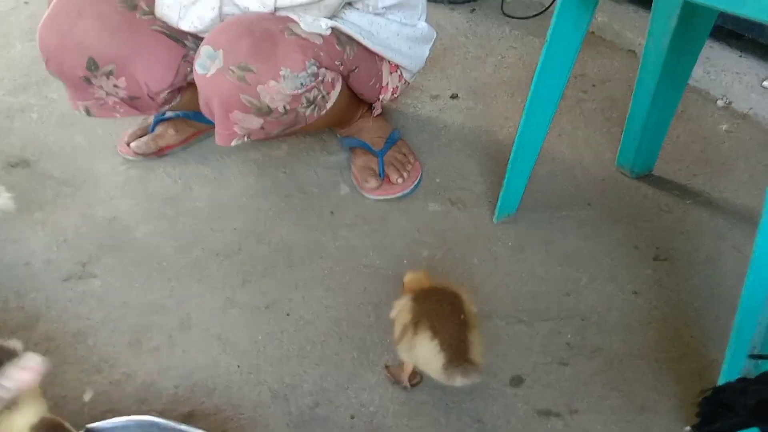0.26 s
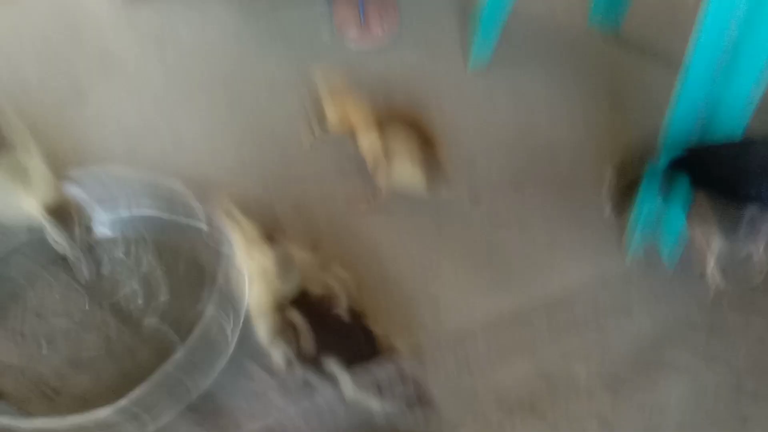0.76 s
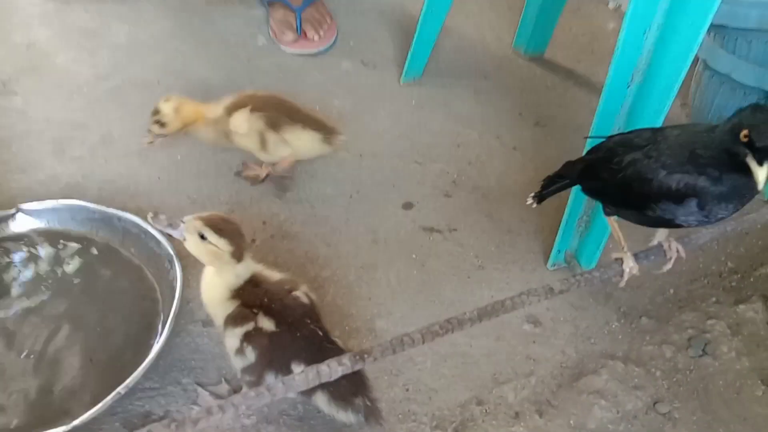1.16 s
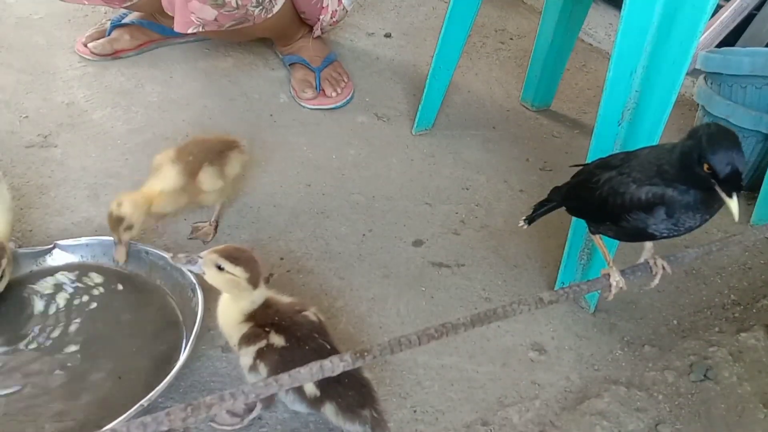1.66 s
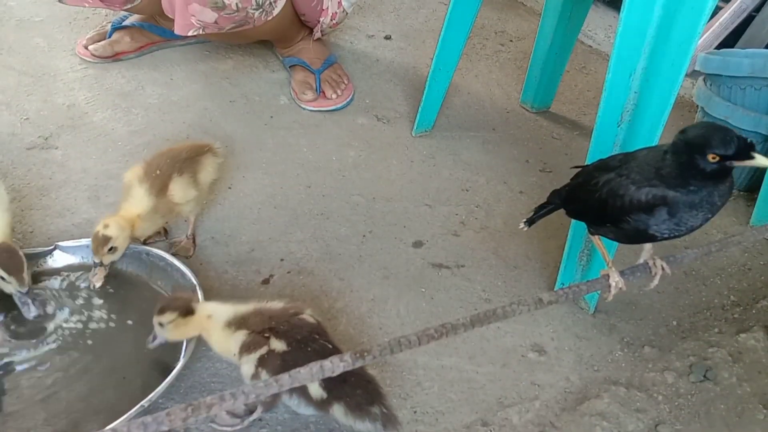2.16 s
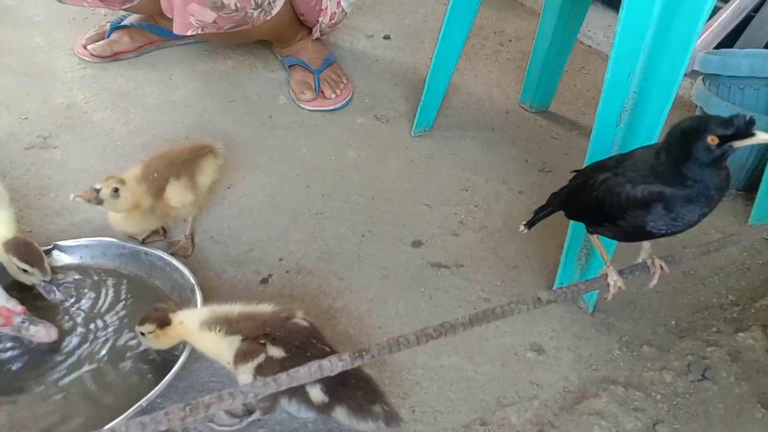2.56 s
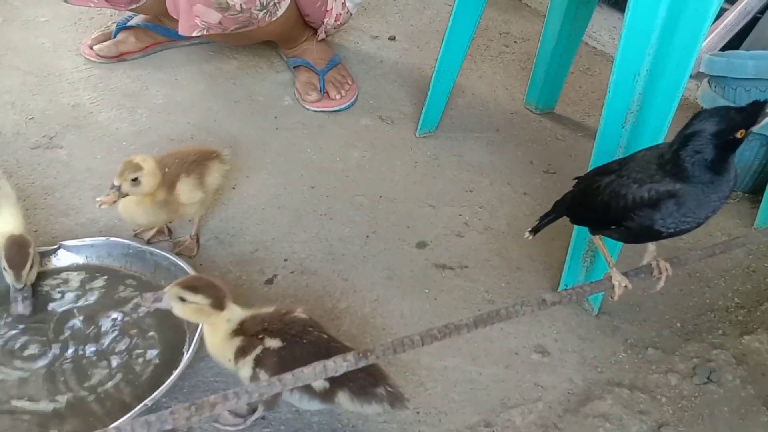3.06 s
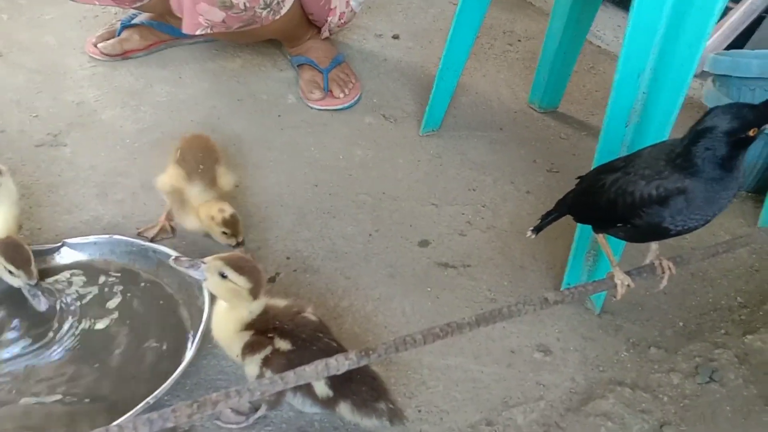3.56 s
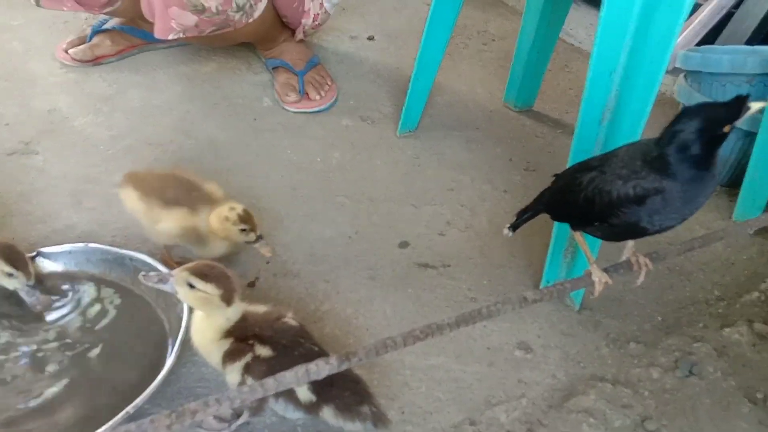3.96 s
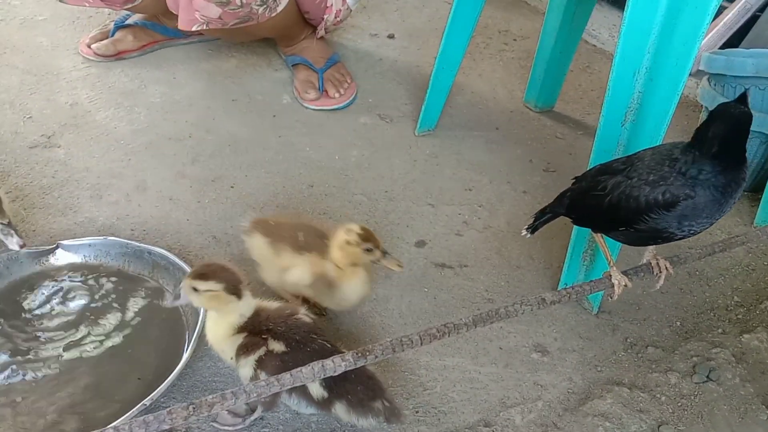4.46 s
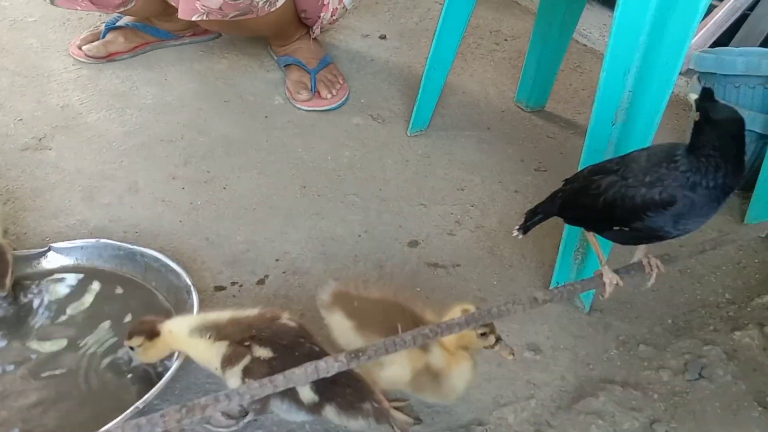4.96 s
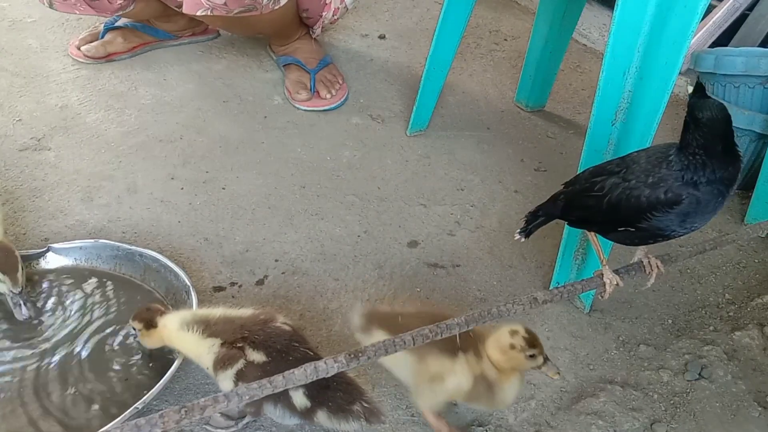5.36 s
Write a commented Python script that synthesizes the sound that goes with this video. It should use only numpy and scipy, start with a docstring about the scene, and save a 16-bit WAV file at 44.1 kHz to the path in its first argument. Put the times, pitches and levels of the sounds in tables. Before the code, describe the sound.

A duckling gives short, high, falling whistled peeps about four times a second, with weaker arched pips from another. In the first second the hand-held microphone is rubbed and sharply clicked and bumped. It then settles, and bills tick, peck and knock at a metal water basin with soft dabbling and drips. Fainter reedy, hoarse birds call further off in a roofed concrete yard.

```python
"""Ducklings peep around a metal water basin on a concrete floor under a roof; the walls smear each glide.
One gives long falling peeps, another short arched pips: trembling whistles with weak overtones.
Further off, other birds call in tones roughened by noise. Bills knock, tick and peck, as struck resonances,
and dabble, as swelling water noise with ringing drips. Close by, the hand-held microphone is rubbed
(swelling noise) and bumped (struck resonances) as it moves, over quiet yard air, a faint hum and its own hiss."""
import sys
import numpy as np
from scipy import signal
from scipy.fft import rfft, irfft, next_fast_len
from scipy.io import wavfile
from scipy.ndimage import uniform_filter1d, map_coordinates

SR = 44100
rng = np.random.default_rng(int(sys.argv[2]) if len(sys.argv) > 2 else 0)


def generate_wav(sig):
    """Save sig (samples, or channels by samples) to the path in sys.argv[1] as 16-bit PCM at SR."""
    pcm = np.round(np.clip(np.atleast_2d(sig).T, -1, 1) * 32767).astype(np.int16)
    wavfile.write(sys.argv[1], SR, pcm)


N = 247966
TIME = np.arange(N) / SR


def amp(db):
    """Decibels to gain."""
    return 10 ** (np.asarray(db) / 20)


def unit(x):
    """Scaled to rms 1."""
    return x / np.sqrt(np.mean(x ** 2) + 1e-20)


def along(points, hz):
    """(Hz, value) points read on a log frequency axis."""
    f, v = np.transpose(points)
    return np.interp(np.log(hz + 1), np.log(f), v)


def wobble(rate, size=N):
    """A smooth random curve, rate knots a second."""
    knots = rng.standard_normal(int(size * rate / SR) + 4)
    return map_coordinates(knots, [np.arange(size) * rate / SR])


def filtered(x, response):
    """x times a complex response of frequency."""
    m = next_fast_len(len(x) + SR // 4)
    return irfft(rfft(x, m) * response(np.fft.rfftfreq(m, 1 / SR)), m)[:len(x)]


def noise(spectrum, spiky_db):
    """Coloured noise of rms 1, made of grains of uneven size."""
    grains = amp(spiky_db * np.minimum(wobble(700), 2))
    return unit(filtered(rng.standard_normal(N) * grains, lambda hz: amp(along(spectrum, hz))))


def patchy(x):
    """Noise whose colour shifts from moment to moment."""
    depth_db = 3.5
    z = signal.stft(x.astype(np.float32), nperseg=512)[2]
    field = uniform_filter1d(rng.standard_normal(z.shape), size=5, axis=0)
    field = uniform_filter1d(field, size=7, axis=1)
    gain = amp(depth_db * np.minimum(unit(field), 2))
    return unit(signal.istft(z * gain, nperseg=512)[1][:N])


def swell(s, rise, fall):
    """Gain of a movement that builds up to time s and dies away."""
    drop_db, shape = 14.5, 2.4  # softer by this one rise before and one fall after; shape 1 pointed, 2 round
    gain = np.zeros(N)
    near = slice(*np.searchsorted(TIME, [s - 4 * abs(rise), s + 4 * abs(fall)]))
    u = np.maximum((s - TIME[near]) / abs(rise), (TIME[near] - s) / abs(fall))
    gain[near] = amp(-drop_db * u ** shape)
    return gain


def swells(rows):
    """Gain of a run of even swells."""
    return sum(amp(db) * swell(s, spread, spread) for s, spread, db in rows)


def add(track, s, sound):
    """Mix a sound into the track at time s."""
    start = round(s * SR)
    part = sound[max(-start, 0):N - start]
    track[max(start, 0):][:len(part)] += part


def fade(size, edge):
    """A flat envelope whose ends taper; edge is the share of the length that the two tapers take up."""
    return signal.windows.tukey(size, np.clip(edge, 0, 1))


def room(x, wet_db, early_db):
    """Direct sound, early walls and a diffuse tail; paths are drawn afresh every quarter second and crossfade."""
    # decay of the walls: f/Hz, t60/s
    wall_decay = [(200, 0.092), (1200, 0.13), (3000, 0.19), (8000, 0.082), (15000, 0.013)]
    out, size = x.copy(), SR // 3
    for start in range(0, N, SR // 4):
        hz, t, z = signal.stft(rng.standard_normal(size), SR, nperseg=256)
        decay = amp(-60 * t / along(wall_decay, hz)[:, None])
        onset = 1 - np.exp(-t / 0.003)
        tail = signal.istft(z * decay * onset, SR, nperseg=256)[1]
        tail *= amp(wet_db) / np.linalg.norm(tail)
        echoes = (rng.uniform(.008, .036, size=6) * SR).astype(int)
        tail[echoes] += amp(early_db) * rng.choice([-1, 1], size=6)
        # each set of paths crossfades into the next
        share = np.clip(1.5 - abs(np.arange(N) - start - SR // 8) / (SR // 8), 0, 1)
        first = max(start - SR // 8, 0)
        add(out, first / SR, signal.fftconvolve((x * share)[first:start + SR // 2], tail))
    return out


def syrinx(pitch, effort, overtones, waver, flutter_db):
    """A nearly pure, trembling whistle; its overtones come and go and need full effort."""
    size = len(pitch)
    phase = 2 * np.pi * np.cumsum(pitch * (1 + waver * wobble(250, size))) / SR
    edge = sum(amp(db + 1.6 * wobble(50, size)) * np.sin(k * phase) for k, db in enumerate(overtones, 2))
    return effort * (np.sin(phase) + effort ** 2 * edge) * amp(flutter_db * wobble(120, size))


def hoarse(pitch, share, blur_rate):
    """A tone partly broken up into a narrow band of noise; blur_rate is in knots a second."""
    size, share = len(pitch), np.clip(share, 0, 1)
    blur = (wobble(blur_rate, size) + 1j * wobble(blur_rate, size)) / np.sqrt(2)
    carrier = np.exp(2j * np.pi * np.cumsum(pitch) / SR)
    return np.real((np.sqrt(1 - share) + np.sqrt(share) * blur) * carrier)


def stroke(rise, fall):
    """Progress through a call: -1 at its start, 0 at its top, 1 at its end."""
    t = np.arange(-abs(rise), abs(fall), 1 / SR)
    return t / np.where(t < 0, abs(rise), abs(fall))


def arch(u):
    """How far an arched call lies below its top: 0 there, 1 at both ends."""
    rounding = .36  # how blunt the top is
    return (np.hypot(u, rounding) - rounding) / (np.hypot(1, rounding) - rounding)


def strike(modes, t60, scrape, soft_hz):
    """One push and a dying scrape through a body's resonances, peak 1; a soft contact loses its treble."""
    t = np.arange(SR // 4) / SR
    force = scrape * rng.standard_normal(len(t)) * amp(-60 * t / t60)
    force[0] += 1

    def body(f):
        """Resonances side by side, of alternating sign."""
        return sum((-1) ** k * amp(db) * 1j * f * width / (hz * hz - f * f + 1j * f * width)
                   for k, (hz, width, db) in enumerate(modes))

    sound = filtered(force, lambda f: body(f) / (1 + 1j * f / soft_hz) ** 2)
    return sound / abs(sound).max()


def peeps():
    """Each peep lifts quickly, sags, then plunges as the pressure goes; a little air rasps along."""
    # long falling peeps: t/s of the top, fall/s, top f/Hz, drop/Hz, relative level/dB
    peep_rows = [(.002, 0.043, 2940, 287, -28), (.006, 0.052, 3155, 264, -39),
                 (0.158, 0.087, 2857, 565, -35), (.278, .055, 3123, 497, -28),
                 (.43, 0.049, 2925, 407, -31.5), (.687, 0.073, 2902, 430, -32),
                 (0.848, 0.043, 3240, 160, -49.5), (.938, 0.064, 2902, 462, -33),
                 (1.186, 0.048, 2990, 260, -32), (1.446, 0.084, 3044, 800, -35.5),
                 (1.69, 0.069, 2990, 743, -34), (1.939, 0.077, 3060, 770, -34),
                 (2.19, 0.065, 3072, 662, -33), (2.475, 0.063, 2988, 620, -29.5),
                 (2.767, .062, 3002, 743, -35), (3.019, .07, 3018, 770, -32.5),
                 (3.269, 0.082, 2985, 690, -33.5), (3.527, 0.068, 2920, 592, -32.5),
                 (3.8, 0.066, 2952, 717, -35), (4.067, 0.059, 2993, 745, -36.5),
                 (4.324, 0.039, 3194, 638, -32), (4.55, .055, 3195, 633, -50)]
    # harmonics 2 to 4 against the whistle at full effort: mean level/dB
    overtones = [-33.5, -34.5, -54]
    # colour of the air in a peep: f/Hz, relative level/dB
    rasp_colour = [(300, -7.5), (800, -1.5), (1270, -2), (1700, -7), (2400, 9), (3300, 10.5), (4200, -7.5),
                   (5700, -10.5), (7500, -12), (9000, -13.5), (14000, -37.5)]
    rise_s, lift_hz = .022, 277.3  # the climb to every top
    sag_share = .33  # share of the drop that is a steady sag; the rest plunges at the end
    loudest = 0.33  # this far into the fall
    attack_db, release_db = 18.5, 9.5  # how much softer the start and the end are
    out, flow = np.zeros(N), np.zeros(N)
    for s, fall, top_hz, drop_hz, db in peep_rows:
        u = stroke(rise_s, fall)
        sag = sag_share * u + (1 - sag_share) * u ** 4
        pitch = top_hz - np.where(u < 0, lift_hz * abs(u) ** 3, drop_hz * sag)
        past = u - loudest
        attack = attack_db * (past / (1 + loudest)) ** 2
        release = release_db * (past / (1 - loudest)) ** 2
        effort = amp(-np.where(past < 0, attack, release)) * fade(len(u), edge=0.093)
        whistle = syrinx(pitch, effort, overtones, waver=.005, flutter_db=1.1)
        add(out, s - rise_s, amp(db - 3.5) * whistle)
        add(flow, s - rise_s, amp(db) * effort)
    rasp = amp(-29.5) * flow * noise(rasp_colour, spiky_db=3)
    return room(out + rasp, wet_db=-2, early_db=-13)


def yard():
    """The quiet of the yard as shifting noise, a wavering low hum and the microphone's steady hiss."""
    # still air: f/Hz, relative level/dB
    air_colour = [(20, -22), (40, -19), (62, 2), (100, -4.5), (160, -1.5), (240, -6), (330, -13),
                  (600, -14.5), (1000, -15.5), (1270, -5.5), (1600, -21), (2900, -14.5), (4000, -20.5),
                  (6000, -25), (9000, -49.5)]
    # course of the still air, which wavers about it: t/s, level/dB
    air_level = [(0, -61), (1, -73.5), (2, -65), (2.7, -72.5), (3.7, -71.5), (4.7, -72.5), (5.62, -73)]
    # swells of the hum: t/s of the peak, spread/s to each side, level/dB about which it flutters
    hum_rows = [(2.22, 0.19, -69), (2.6, 0.31, -72.5), (3.52, 0.16, -65.5), (4.22, 0.15, -70)]
    # the microphone's own hiss: f/Hz, relative level/dB
    hiss_colour = [(1000, 2), (6000, -3), (8500, -2.5), (13500, -10.5), (15200, -5), (16000, -1)]
    air = amp(np.interp(TIME, *np.transpose(air_level))) * patchy(noise(air_colour, spiky_db=-1.5))
    air *= amp(0.59 * wobble(5.4))
    hum_pitch = 233 + 7 * wobble(30)  # Hz
    hum = swells(hum_rows) * amp(1.4 * wobble(44)) * np.sin(2 * np.pi * np.cumsum(hum_pitch) / SR)
    return air + hum + amp(-81.0) * noise(hiss_colour, spiky_db=1)


def rubbing():
    """Cloth and fingers drag in small slips near the microphone: a rumble, a scuff and a hiss."""
    # strokes: t/s of the peak, rise/s, fall/s, then rumble, scuff and hiss level/dB before slips and room
    rub_rows = [(.11, 0.067, 0.097, -77.5, -52.5, -55), (.26, 0.092, .1, -57.5, -55, -54.5),
                (.4, 0.084, 0.091, -54.5, -51, -60), (0.496, 0.033, 0.01, -42.5, -41.5, -53),
                (0.539, 0.022, .05, -48, -43, -51), (0.658, 0.11, 0.066, -61.5, -36.5, -46.5),
                (0.769, 0.1, 0.031, -66.5, -50.5, -59.5), (0.939, 0.075, 0.13, -59, -52, -64.5),
                (1.166, 0.057, 0.041, -47.5, -52.5, -56), (1.228, 0.094, 0.058, -61, -39.5, -53),
                (1.38, 0.21, 0.076, -78, -62, -89), (1.6, 0.16, 0.058, -56, -53, -83),
                (1.798, 0.039, 0.11, -65, -50.5, -58.5), (1.89, 0.065, 0.087, -60, -52.5, -61.5),
                (2.09, 0.089, 0.09, -74, -58.5, -72), (4.05, 0.085, 0.086, -58.5, -61.5, -51.5),
                (5.538, 0.031, 0.095, -64, -51, -61.5)]
    # rumble: f/Hz, relative level/dB
    rumble_colour = [(25, -37.5), (50, -14), (80, -2.5), (130, 4), (190, -4), (260, -2), (350, 0),
                     (600, -48.5)]
    # scuff: f/Hz, relative level/dB
    scuff_colour = [(120, -33.5), (250, -17.5), (450, -4), (700, -2), (950, -3.5), (1270, 2), (1600, -2),
                    (2200, -2), (3300, -6.5), (4500, -30.5), (8000, -42)]
    # hiss: f/Hz, relative level/dB
    hiss_colour = [(1500, -12), (3000, 5), (4500, 2.5), (5600, 4.5), (7200, -1.5), (8200, -12.5),
                   (9500, -8.5), (13500, -20), (15200, -11.5), (16000, -3)]
    rumble = noise(rumble_colour, spiky_db=2.5)
    scuff = patchy(noise(scuff_colour, spiky_db=4.5))
    hiss = patchy(noise(hiss_colour, spiky_db=4))
    layers = [rumble, scuff, hiss]
    slips = unit(amp(2 * wobble(70)))
    power = np.zeros((len(layers), N))
    for s, rise, fall, *levels_db in rub_rows:
        power += np.outer(amp(levels_db) ** 2, swell(s, rise, fall) ** 2)
    drag = np.sum(np.sqrt(power) * layers, axis=0) * slips
    return room(drag, wet_db=-10.5, early_db=-20.5)


def reedy_notes():
    """A further bird's drooping notes: a fairly clear tone under rougher upper partials."""
    # t/s of the start, length/s, starting f/Hz, relative level/dB, relative level/dB of two partials
    reedy_rows = [(0.045, 0.072, 2261, -44.5, -31), (0.322, .075, 2226, -43, -37),
                  (1.834, 0.081, 2143, -48.5, -40), (2.141, 0.067, 2199, -48, -14),
                  (2.396, 0.071, 2256, -51.5, -21), (2.723, 0.1, 2343, -47.5, -27),
                  (4.316, .085, 2050, -61, -24), (4.538, 0.098, 2177, -52, -1.5),
                  (4.798, .09, 2196, -50, -1.5), (5.049, 0.11, 2207, -53, -0.5),
                  (5.325, 0.13, 2256, -67, 11.5)]
    rough = .38  # noise share of the upper partials
    out = np.zeros(N)
    for s, length, hz, db, upper_db in reedy_rows:
        u = np.linspace(0, 1, int(length * SR))
        note = hoarse(hz * (1 - 0.037 * u ** 2), share=0.069, blur_rate=240)
        note += amp(-18) * hoarse(2 * hz * (1 - 0.057 * u), share=rough, blur_rate=550)
        for ratio, droop, trim_db in [(1.3, 0.11, 1), (1.62, 0.098, 3)]:
            partial = hoarse(hz * ratio * (1 - droop * u ** 2), share=rough, blur_rate=380)
            note += amp(upper_db + trim_db) * partial
        add(out, s, amp(db - 3) * fade(len(u), edge=0.53) * note)
    return out


def far_chirps():
    """Thin chirps that sweep upward, each a tone mostly broken up into noise."""
    # t/s of the start, relative level/dB
    chirp_rows = [(2.7, -76.5), (2.785, -70.5), (2.931, -80), (3.373, -79), (3.463, -68.5), (3.829, -65.5),
                  (4.14, -67.5), (4.269, -66), (4.502, -67.5), (4.725, -70.5), (4.914, -66.5), (5.162, -67),
                  (5.462, -63.5)]
    out = np.zeros(N)
    u = np.linspace(0, 1, int(0.049 * SR))
    for s, db in chirp_rows:
        chirp = hoarse(5050 + 1200 * u, share=.65, blur_rate=890)
        add(out, s, amp(db + 3.5) * fade(len(u), edge=0.78) * chirp)
    return out


def chatter():
    """Hoarse notes of a lower voice, arched in pitch and softer at both ends."""
    # t/s of the top, length/s, top f/Hz, relative level/dB
    chatter_rows = [(2.159, 0.11, 1550, -46.5), (2.185, 0.05, 1233, -40), (2.217, 0.056, 1313, -36.5),
                    (2.239, 0.064, 961, -42.5), (2.283, 0.086, 1300, -38.5), (2.295, 0.042, 962, -40.5),
                    (2.34, .07, 937, -45.5), (2.346, .08, 1250, -47.5), (4.984, .03, 891, -51),
                    (4.992, 0.052, 1318, -42.5), (5.028, 0.035, 873, -44), (5.036, 0.044, 1326, -43),
                    (5.073, 0.026, 1270, -39.5), (5.078, .03, 850, -41)]
    sweep_share, edge_db = 0.234, 17.5  # share of the pitch, and level, lost at both ends
    out = np.zeros(N)
    for s, length, top_hz, db in chatter_rows:
        u = stroke(length / 2, length / 2)
        note = hoarse(top_hz * (1 - sweep_share * arch(u)), share=.35, blur_rate=240)
        add(out, s - length / 2, amp(db - 5.5 - edge_db * u ** 2) * fade(len(u), edge=0.1) * note)
    return out


def far_birds():
    """Reedy notes, thin chirps and hoarse low calls at a distance, strongly mixed with the walls."""
    return room(reedy_notes() + far_chirps() + chatter(), wet_db=-3.0, early_db=-14)


def droplets(flow, count):
    """Small drips off the bills, scattered in time and pitch, louder where the dabbling is busy."""
    out, t = np.zeros(N), np.arange(SR // 40) / SR
    for when, size, pitch in rng.uniform(size=(count, 3)):
        s, hz = 1.3 + 4.25 * when, 1600 * 3.5 ** pitch
        life = hz * t / 9  # a bubble rings for a few cycles and rises in pitch
        ring = np.sin(2 * np.pi * hz * t * (1 + 4 * t)) * life * np.exp(1 - 2 * life)
        add(out, s, flow[int(s * SR)] * amp(6 + 8 * size ** 2) * ring)
    return out


def dabbling():
    """Bills stir the water: uneven noise that swells in bouts, with drips."""
    # bouts: t/s of the peak, spread/s to each side, relative level/dB
    dabble_rows = [(2.23, .1, -54.5), (2.42, 0.21, -53.5), (2.85, .06, -55), (3.57, 0.11, -59),
                   (3.84, .07, -54), (4.05, 0.035, -63.5), (4.34, 0.15, -61.5), (5.14, 0.13, -58.5),
                   (5.4, 0.11, -59), (5.57, 0.053, -61)]
    # stirred water: f/Hz, relative level/dB
    water_colour = [(700, -19), (1250, -7), (1800, 7), (3000, 4), (4200, 4.5), (5600, -2), (7200, -5),
                    (8500, -23.5), (12000, -22), (16000, -18.5)]
    flow = swells(dabble_rows)
    stirring = flow * amp(-8) * noise(water_colour, spiky_db=5.5) * unit(amp(4 * wobble(22)))
    return stirring + droplets(flow, count=90)


def basin():
    """Bills knock around the metal basin, tick and peck as struck resonances, and dabble in the water."""
    # knocks: t/s, peak level/dB before the room, scrape t60/s
    knock_rows = [(2.406, -39, 0.12), (2.59, -52.5, 0.1), (2.969, -58, 0.21), (3.055, -54, 0.27),
                  (3.131, -49.5, 0.042), (3.37, -54, 0.14), (3.167, -47.5, 0.024), (3.804, -54, 0.39),
                  (4.608, -53, 0.21), (5.085, -30, 0.092), (5.097, -34.5, 0.32), (5.218, -52, 0.18),
                  (5.512, -43, 0.064), (5.531, -41, 0.19)]
    # resonances of the basin: f/Hz, width/Hz, relative level/dB
    basin_modes = [(222, 300, -8), (468, 485, -2.5), (574, 266, -1.5), (826, 70, -3.5), (1247, 86, 3),
                   (1920, 100, -11.5), (3640, 590, -15.5)]
    # bill ticks and drips: t/s, peak level/dB before the room, resonance f/Hz
    tick_rows = [(0.204, -43, 9360), (0.3971, -36.5, 4900), (0.9475, -42.5, 4970), (1.6242, -48, 3950),
                 (2.0771, -40, 7400), (2.1585, -45.5, 4330), (2.2673, -52, 3930), (2.3306, -35.5, 7040),
                 (2.4024, -41.5, 3940), (2.5092, -46, 4130), (2.5609, -45.5, 5100), (2.857, -53.5, 5450),
                 (2.8799, -47.5, 5180), (2.9672, -49.5, 7370), (3.17, -54.5, 3790), (3.5562, -47.5, 4200),
                 (3.5919, -42.5, 3990), (3.9775, -46.5, 5500), (4.099, -37.5, 6700), (4.9334, -54, 6000),
                 (4.9769, -53, 4240), (5.4149, -41.5, 7250), (5.5389, -43.5, 6200)]
    # hard pecks: t/s, peak level/dB before the room, resonance f/Hz
    peck_rows = [(2.067, -35, 3130), (2.246, -35.5, 3400), (3.167, -45, 940), (4.9583, -29, 3380),
                 (5.399, -39, 3620)]
    out = dabbling()
    for s, db, t60 in knock_rows:
        add(out, s, amp(db) * strike(basin_modes, t60, scrape=0.1, soft_hz=7000))
    for s, db, hz in tick_rows:
        add(out, s, amp(db) * strike([(hz, 800, 0)], t60=0.022, scrape=1.0, soft_hz=11900))
    for s, db, hz in peck_rows:
        add(out, s, amp(db) * strike([(hz, 420, 0)], t60=.01, scrape=.6, soft_hz=4000))
    return room(out, wet_db=-12.5, early_db=-28)


def pips():
    """Each pip is a whistle that sweeps straight up and down again, loudest at the top."""
    # short arched pips: t/s of the top, length/s, top f/Hz, sweep/Hz, relative level/dB
    pip_rows = [(0.422, 0.065, 2614, 398, -44.5), (0.51, 0.07, 3227, 429, -43.5),
                (0.613, 0.034, 3530, 702, -34), (1.121, 0.054, 2980, 457, -50.5),
                (1.263, .048, 3230, 284, -48.5), (1.864, 0.028, 2650, 475, -36.5),
                (3.292, 0.051, 2896, 734, -47.5), (3.41, .058, 2886, 710, -53.5),
                (3.483, 0.066, 2426, 450, -53), (3.9, 0.044, 3000, 572, -39),
                (4.285, .052, 2910, 757, -45.5), (4.461, 0.056, 3020, 870, -43.5),
                (5.22, 0.056, 3126, 970, -40.5), (5.398, .056, 3214, 860, -41),
                (5.583, 0.051, 2900, 727, -41.5)]
    edge_db = 12  # how much softer the feet of the arch are
    out = np.zeros(N)
    for s, length, top_hz, sweep_hz, db in pip_rows:
        u = stroke(length / 2, length / 2)
        effort = amp(-edge_db * u ** 2) * fade(len(u), edge=0.081)
        pitch = top_hz - sweep_hz * arch(u)
        whistle = syrinx(pitch, effort, [-37, -47, -56], waver=0.0031, flutter_db=2.0)
        add(out, s - length / 2, amp(db + 6.5) * whistle)
    return room(out, wet_db=-16.5, early_db=-22.5)


def bumping():
    """Clicks, bumps and low thuds as struck resonances, without the room."""
    # sharp clicks on the casing: t/s, peak level/dB
    click_rows = [(0.4878, -27.5), (0.5332, -9.5), (0.54, -18.5), (0.685, -32.5), (0.8804, -17),
                  (0.8853, -11.5), (0.89, -7), (0.9087, -25.5)]
    # casing under a click: f/Hz, width/Hz, relative level/dB
    click_modes = [(510, 410, -3), (1240, 710, -2.5), (2090, 920, -1), (3133, 1600, -2.5),
                   (3960, 1100, -2.5), (6900, 2000, -17), (10240, 2600, -19.5)]
    # dull bumps: t/s, peak level/dB, scrape t60/s
    bump_rows = [(.868, -27.5, 0.037), (.873, -23, 0.091), (.883, -16, 0.074), (0.8876, -11.5, 0.024),
                 (0.895, -27.5, 0.07), (1.152, -34, 0.062), (2.284, -42, 0.085), (2.842, -51, 0.092)]
    # resonances of a bump: f/Hz, width/Hz, relative level/dB
    bump_modes = [(140.7, 13, -0.5), (238, 28, -6.5), (414.7, 160, -3), (870, 31, -11.5), (1300, 170, -8),
                  (1950, 34, -16.5)]
    # low thuds, a few under knocks: t/s, peak level/dB, resonance f/Hz
    thud_rows = [(0.882, -28.5, 255), (0.891, -34, 85), (0.973, -42, 146), (1.604, -36.5, 120),
                 (2.838, -47, 175), (2.854, -49.5, 140), (4.004, -44.5, 100), (4.046, -42.5, 83),
                 (5.092, -36, 320), (5.54, -43.5, 346)]
    out = np.zeros(N)
    for s, db in click_rows:
        add(out, s, amp(db) * strike(click_modes, t60=0.02, scrape=0.056, soft_hz=20100))
    for s, db, t60 in bump_rows:
        add(out, s, amp(db) * strike(bump_modes, t60, scrape=0.098, soft_hz=3593))
    for s, db, hz in thud_rows:
        add(out, s, amp(db) * strike([(hz, 40, 0)], t60=0.011, scrape=0.029, soft_hz=306.8))
    return out


def scene():
    """Everything at one microphone."""
    return (peeps() + yard() + rubbing() + far_birds() + basin() + pips() + bumping())[None]


def record(dry):
    """The microphone loses the deepest bass; nothing is kept above the band limit."""
    cut_hz, top_hz = 29, 15850  # bass roll-off, band limit

    def response(hz):
        """A second-order low cut with a sharp upper limit."""
        low_cut = -hz ** 2 / (cut_hz ** 2 - hz ** 2 + 1j * np.sqrt(2) * hz * cut_hz)
        return low_cut * (hz < top_hz)

    return np.array([filtered(channel, response) for channel in dry])


dry = scene()
out = record(dry)
generate_wav(out)
```